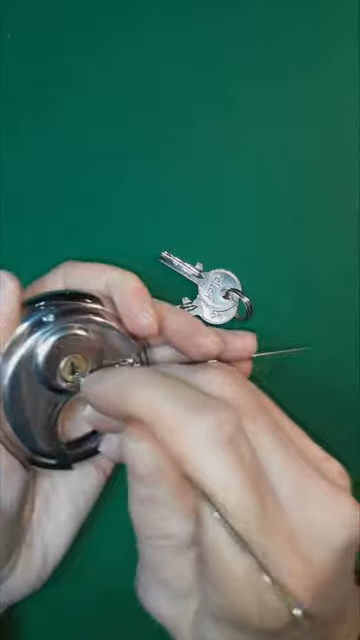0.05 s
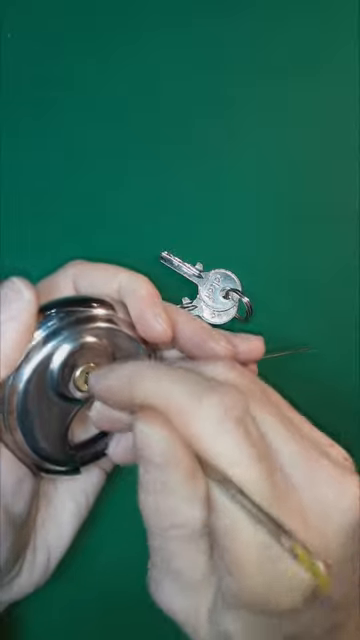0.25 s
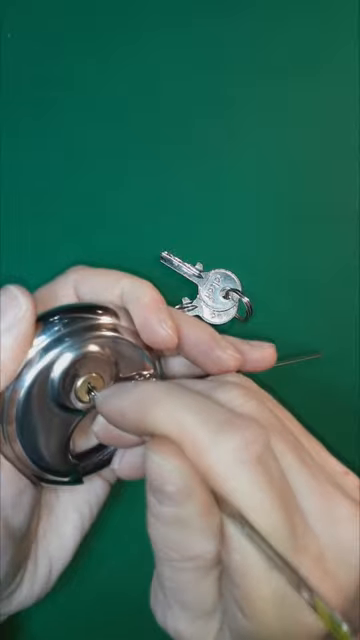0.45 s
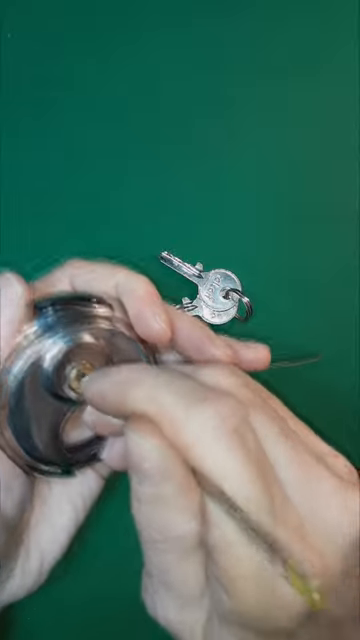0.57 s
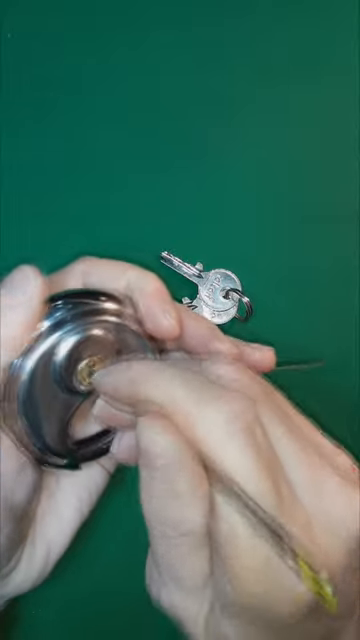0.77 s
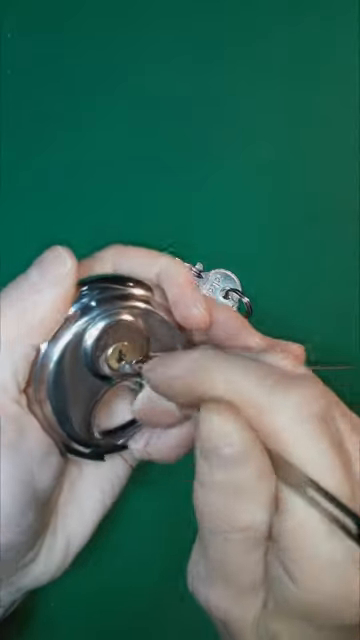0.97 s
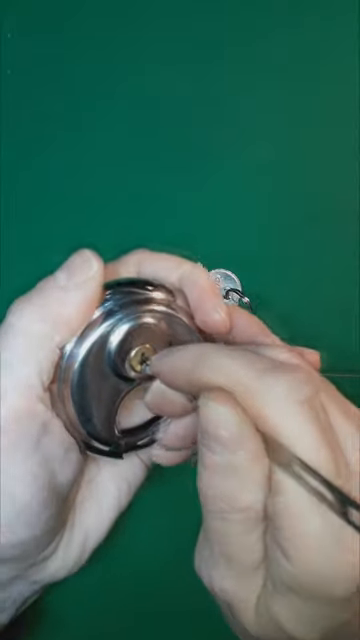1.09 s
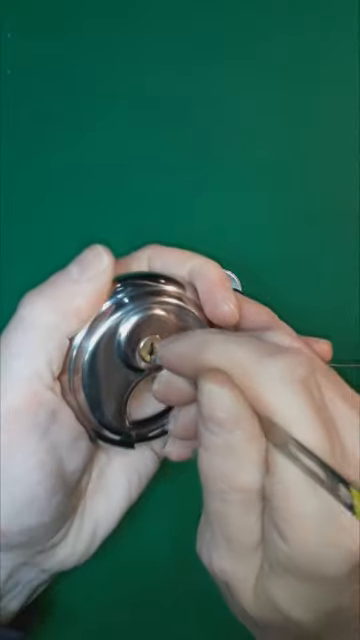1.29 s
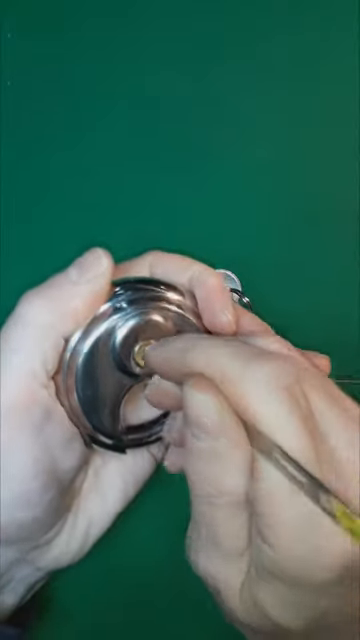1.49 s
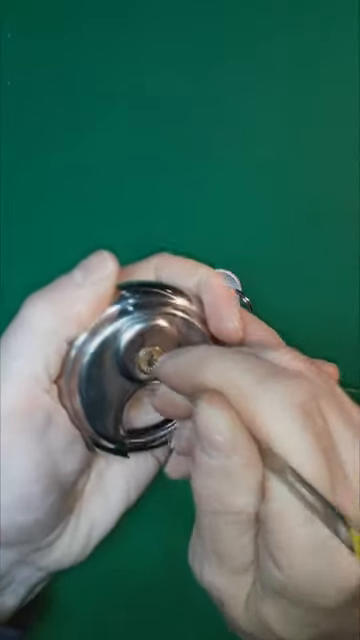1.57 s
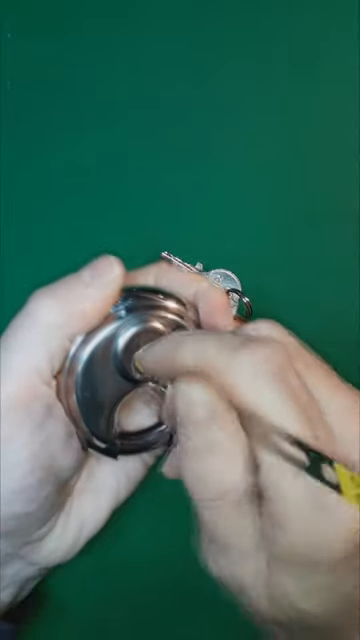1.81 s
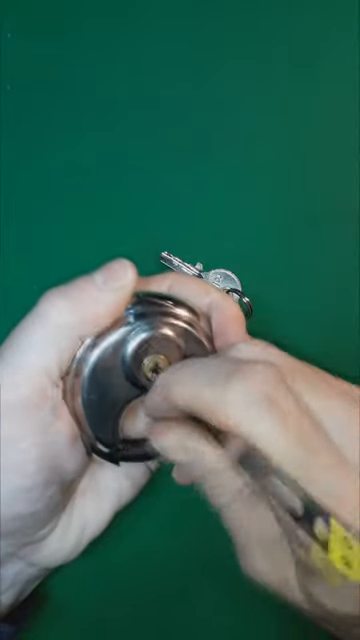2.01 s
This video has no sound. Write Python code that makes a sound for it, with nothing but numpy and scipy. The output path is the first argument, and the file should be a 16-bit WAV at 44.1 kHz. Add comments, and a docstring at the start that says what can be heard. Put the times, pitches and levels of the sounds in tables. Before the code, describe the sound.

A thin steel pick clicks and scrapes inside a metal padlock, with a few loud sharp snaps

```python
"""Small metallic clicks and scrapes, a few loud snaps, rattles dying away and soft skin rustle, close by.
A thin steel pick works inside a round padlock held in both hands, in a quiet room.
Each slip of pick or pin is a short chatter of contacts that rings the lock's modes; snaps are sine packets
and spring tones fading sines. Skin on the case, low rumble and room tone are shaped noise.
Noise tails add near reflections and a longer room tail to the clicks and snaps."""
import sys
import numpy as np
from scipy import signal
from scipy.fft import rfft, irfft
from scipy.io import wavfile

SR = 44100
rng = np.random.default_rng(int(sys.argv[2]) if len(sys.argv) > 2 else 0)


def field_ratio(decibels):
    """Amplitude ratio for a level in dB (20 dB per decade); scalars and array-likes work."""
    return 10 ** (np.asarray(decibels, dtype=float) / 20)


def to_wav(s):
    """Save 16-bit WAV."""
    ch = np.atleast_2d(s).T  # columns
    pcm = np.round(np.clip(ch, -1, 1) * 32767)  # PCM
    wavfile.write(sys.argv[1], SR, pcm.astype(np.int16))


N = 90404

# slips of the pick: (time [s], strength [dB], mid share [dB], top share [dB],
# chatter length [ms], lasting ring share [dB]); pick() trims strengths and caps the shares
PICK_SLIPS = [(0.0054, -22.5, -5, -14.5, 3.6, -28), (0.1082, -48.5, 10, -4, 1.1, -48),
              (0.2046, -46, 7, -9, 1.5, -26), (0.2147, -22, -3, -11.5, 0.7, -36),
              (0.2195, -21.5, 13, -1, 1.9, -40), (0.229, 1.5, -34.5, -25.5, 0.43, -29),
              (0.327, -33.5, 3, -13.5, 0.28, -23.5), (0.351, -52.5, 2.5, -13, 2, -31),
              (0.5722, -52.5, 11, -21, 1.53, -13.5), (0.5971, -36, -2, 0.5, 1.3, -16),
              (0.662, -47, 16, -8, 4.5, -14), (0.6691, -35, -57, -44, 0.66, -26),
              (0.8599, -57, 10.5, -7, 0.89, -11), (0.8813, -28, -7.5, -22.5, 0.432, -27.5),
              (0.9424, -42.5, 5, -17, 2.8, -21), (0.9683, -62, 4, -7, 1.05, -24),
              (0.9743, -43, -15, -12, 1, -23), (0.9813, -35.5, 7.5, 0, 2, -10),
              (0.991, -34.5, 1, -12, 0.89, -10), (0.9934, -34, 9, -26, 1.8, -23),
              (1.0077, -27.5, 2, -4, 2.2, -26), (1.0373, -43.5, -2, -14, 3, -26),
              (1.0542, -40, -6, -23, 0.74, -31), (1.0692, -36.5, 9.5, -16, 1.9, -19),
              (1.0705, -35, 0, -12, 2.9, -24), (1.0764, -30.5, 4, -6, 4.9, -16),
              (1.0888, -48.5, 11, -5, 3.1, -10.5), (1.0907, -18.5, -7.5, -9.5, 2.9, -22.5),
              (1.16, -53.5, 6, -6, 1.6, -36), (1.271, -56, 4, -15, 0.63, -19),
              (1.2727, -51, 10, -34, 3.1, -3.5), (1.3075, -42, 0, -4, 2.7, -28),
              (1.3095, -43, -29, -38, 5.2, -19), (1.3909, -50, 6, -19.5, 6.3, -18),
              (1.425, -33, 11, -2, 2.7, -9), (1.4355, -30.5, 13.5, -34, 1.8, -8.5),
              (1.4607, -33, 6.5, 0, 1.2, -20), (1.4985, -57, -10, -16, 1, -20),
              (1.5115, -46, 13, 7, 2.44, -28), (1.5179, -30, 1, -8, 2.9, 0),
              (1.5262, -28.5, 7.5, -22, 5.8, -18), (1.5373, -28, 7, -12, 0.61, -24),
              (1.5396, -9, -12.5, -4.5, 0.61, -27), (1.5983, -42.5, 6.5, -6, 2.7, -14),
              (1.6972, -56, -17, -18, 2.7, -22), (1.731, -47, -2, -16, 4.3, -20),
              (1.747, -55, -4, -1.5, 2, -12), (1.777, -30, -1, 4, 1.6, -19.5),
              (1.9396, -37.5, -4, -9, 0.71, -19.5), (1.9449, -34, 3, -10, 2.4, -28),
              (1.9764, -44.5, -16, -31, 1.4, -23), (1.9828, -41.5, -1, -25, 0.58, -22),
              (1.9946, -43, -9.5, -14, 0.5, -15), (2.038, -49, -22, -18, 0.67, -14)]
# lock modes damped by the hands: (frequency [Hz], level [dB], t60 before the damping cap [s])
LOCK_MODES = [(1890, -20.5, 0.0021), (2194, -16, 0.036), (2938, -3, 0.014), (3166, -1.5, 0.0096),
              (3540, -10, 0.0072), (4390, -1.5, .011), (4776, -5.5, 0.011), (5210, -3.5, 0.01),
              (5780, 0.5, 0.0074), (6297, -5, 0.019), (6573, -11.5, 0.03), (7034, -6.5, 0.015),
              (11716, 4, 0.0027), (13400, 9.5, 0.001), (15100, -11.5, 0.0019)]
MID_FROM_HZ, TOP_FROM_HZ = 3800, 9000  # modes in these ranges follow the mid and top shares
LONGEST_T60_S = 0.016  # the hands let no lock mode ring longer
LEAD, RUN = 400, 1000  # samples of creep before a slip, and of its whole run


def cut(x, hz, kind, order=2):
    """Butterworth filter."""
    return signal.sosfilt(signal.butter(order, hz, kind, fs=SR, output="sos"), x)


def rms_one(x):
    """Scale to rms 1."""
    return x / np.sqrt(np.mean(x ** 2) + 1e-20)


def in_time(rows):
    """Draw each automation column at every sample, with straight lines between points."""
    times, *columns = np.transpose(rows)
    return [np.interp(np.arange(N) / SR, times, column) for column in columns]


def coloured(spectrum):
    """Noise of rms 1 whose spectrum follows the curve, in dB over log frequency."""
    hz, db = np.transpose(spectrum)
    grid = np.maximum(np.arange(N // 2 + 1) * SR / N, 1)
    gain = field_ratio(np.interp(np.log(grid), np.log(hz), db, left=-80, right=-80))
    return rms_one(irfft(rfft(rng.standard_normal(N)) * gain, N))


def drift(rate):
    """Slow chance: straight lines between random knots of spread 1, at rate knots per second."""
    knots = rng.standard_normal(400)
    return np.interp(np.arange(N) / SR * rate, np.arange(400), knots)


def ring(push, hz, t60):
    """Two-pole resonator: a unit click sets a decaying sine of starting height 1 ringing."""
    radius, turn = field_ratio(-60 / (t60 * SR)), 2 * np.pi * hz / SR
    return signal.lfilter([0, np.sin(turn)], [1, -2 * radius * np.cos(turn), radius * radius], push + 1e-18)


def contacts(shape, per_s):
    """Tiny contacts at random moments, with uneven sizes and signs."""
    spread_db = 3.0
    moment, size, sign = rng.random((3,) + shape)
    return field_ratio(-spread_db * np.log(size + 0.01)) * np.sign(sign - 0.5) * (moment < per_s / SR)


def rubbing():
    """Skin on the case: flickering low and bright rustle, and noise that rings the lock's low modes."""
    # levels before flicker: (time [s], low rustle [dB], bright rustle [dB], ringing low modes [dB])
    rub_levels = [(0.0, -77, -74, -73), (0.2, -71, -66.5, -83), (0.35, -64.5, -62, -87),
                  (0.48, -70, -69, -86), (0.55, -74.5, -73.5, -85), (0.65, -71, -66.5, -74),
                  (0.69, -88.5, -96, -81), (0.91, -78, -76.5, -101), (1.03, -69.5, -58.5, -78),
                  (1.18, -87.5, -69.5, -97), (1.37, -95, -82, -83), (1.49, -68.5, -63.5, -65),
                  (1.61, -63.5, -59.5, -70.5), (1.66, -67, -65.5, -68.5), (1.73, -58.5, -55.5, -59.5),
                  (1.88, -65.5, -65, -67.5), (2.05, -74.5, -65, -66)]
    # colours of the two rustles: (frequency [Hz], density [dB per Hz])
    low_colour = [(88, -45.5), (150, -13), (283, -2.5), (401, 3), (468, 0), (728, -1.5), (954, -4),
                  (1500, -12.5), (1950, -40.5), (3300, -120)]
    bright_colour = [(880, -26.5), (1500, -19), (1690, -1.5), (2560, -4), (2830, -11.5), (3590, -4.5),
                     (4550, -1), (7170, -3), (9280, -27), (13700, -13), (16000, -21.5)]
    flicker_db = 2
    low_db, bright_db, lock_db = in_time(rub_levels)
    white = rng.standard_normal(N)
    lock = rms_one(sum(field_ratio(db) * ring(white, hz, min(t60, LONGEST_T60_S))
                       for hz, db, t60 in LOCK_MODES if hz < MID_FROM_HZ))
    bright = field_ratio(bright_db) * coloured(bright_colour) + field_ratio(lock_db) * lock
    low = field_ratio(low_db + flicker_db * drift(21)) * coloured(low_colour)
    return low + field_ratio(flicker_db * drift(87)) * bright


def rumble():
    """Thumps of the hands felt through the table: low band noise that swells and sinks."""
    # (time [s], level [dB])
    rumble_levels = [(0.0, -87), (0.03, -61.5), (0.16, -80.5), (0.25, -52), (0.29, -65.5), (0.39, -79.5),
                     (0.93, -82.5), (1.08, -76), (1.25, -87.5), (1.57, -65), (1.59, -77.5), (2.05, -72)]
    level_db, = in_time(rumble_levels)
    noise = cut(rng.standard_normal(N + 4000), [65, 139], "band", order=3)
    return field_ratio(level_db) * rms_one(noise[4000:])  # skip the filter's start


def room_tone():
    """Steady coloured noise of the quiet room."""
    # (frequency [Hz], density [dB per Hz])
    room_colour = [(15, -50), (25, -13.5), (263, -5.5), (516, -7), (677, -11.5), (1440, -18), (1740, -34.5),
                   (2280, -25.5), (10400, -23.5), (14800, -26.5), (16000, -25)]
    return field_ratio(-86.5) * coloured(room_colour)


def chatters():
    """One run of contacts per slip: it creeps in, swells over its length, then settles; energy 1."""
    creep_db, creep_s = -20.5, 0.004  # faint contacts grow before each slip
    settle_s, settle_share = 0.00088, 0.82  # fall time: a fixed part plus a share of the length
    t = (np.arange(RUN) - LEAD) / SR
    length = np.array(PICK_SLIPS)[:, 4:5] / 1000
    swell = np.clip(t / length, 0, 1) ** 1.5
    creep = field_ratio(creep_db) * np.exp(np.minimum(t, 0) / creep_s)
    settle = np.exp(-np.maximum(t - length, 0) / (settle_s + settle_share * length))
    grains = np.array([contacts((RUN,), 14000) for _ in PICK_SLIPS])
    runs = (swell + creep) * settle * grains
    return runs / np.sqrt(np.sum(runs ** 2, axis=1, keepdims=True))


def place(runs, gains_db):
    """Lay the runs on the time line, each led in by its creep."""
    out = np.zeros(N + RUN)
    for row, run, db in zip(PICK_SLIPS, runs, gains_db):
        i = int(row[0] * SR)
        out[i:i + RUN] += field_ratio(db) * run
    return out[LEAD:N + LEAD]


def strike(runs, gains_db, hz, t60):
    """Ring one mode; each run feeds it as much energy as a single contact of its strength."""
    single = np.sum(ring(signal.unit_impulse(RUN, LEAD), hz, t60) ** 2)
    fed = np.sum(ring(runs, hz, t60) ** 2, axis=1, keepdims=True)
    return ring(place(runs * np.sqrt(single / fed), gains_db), hz, t60)


def pick():
    """Every slip strikes all modes with strengths of its own, plus bare cracks and a dull knock in the palm."""
    # modes that keep ringing: (frequency [Hz], level [dB], t60 [s])
    bell_modes = [(2840, 4.5, .1), (2920, -2, 0.11), (4650, -13.5, 0.04), (7040, -17.5, .06),
                  (11500, -22.5, 0.027)]
    slip_gain_db, mode_scatter_db = -6.5, 6
    most_mid_db, most_top_db, most_ring_db = 9, -12, -19  # caps on the shares
    crack_db, crack_top_db, thud_db = -14, -17, -20.5
    runs = chatters()
    _, strength, mid, top, _, lasting = np.transpose(PICK_SLIPS)
    mid, top = np.minimum(mid, most_mid_db), np.minimum(top, most_top_db)
    lasting = np.minimum(lasting, most_ring_db)
    scatter = mode_scatter_db * rng.standard_normal((len(PICK_SLIPS), 24))
    peak = strength + slip_gain_db
    # the contacts themselves, heard bare
    metal = cut(place(runs, peak + mid + crack_db), 18000, "low", order=4)
    metal += cut(place(runs, peak + top + crack_top_db), [11000, 14800], "band")
    for k, (hz, db, t60) in enumerate(LOCK_MODES):
        share = 0 if hz < MID_FROM_HZ else mid if hz < TOP_FROM_HZ else top
        metal += strike(runs, peak + share + db + scatter[:, k], hz, min(t60, LONGEST_T60_S))
    for k, (hz, db, t60) in enumerate(bell_modes):
        metal += strike(runs, strength + lasting + db + scatter[:, -1 - k], hz, t60)
    rattle, knocks = rattles()
    # the case knocks in the palm
    thud = cut(place(runs, strength + thud_db) + knocks, [300, 1300], "band")
    # small parts radiate little bass
    return cut(metal + rattle, 1866, "high", order=4) + thud


def spring():
    """Thin wavering sines that fade and sing until the next touch damps them fast."""
    # (start [s], end [s], frequency [Hz], starting level before wavering [dB], fade [dB per s])
    spring_tones = [(.025, .107, 6360, -65, 110), (.688, .712, 1090, -68, 60), (1.1, 1.272, 2911, -53, 170),
                    (1.315, 1.425, 2910, -61, 70)]
    t, out = np.arange(N) / SR, 0
    for start, end, hz, db, fade in spring_tones:
        level = field_ratio(db - fade * np.maximum(t - start, 0))
        gate = np.clip((t - start) / 0.0021, 0, 1) * np.clip((end - t) / 0.0036, 0, 1)
        out = out + level * gate * np.sin(2 * np.pi * hz * t) * field_ratio(2.0 * drift(52))
    return out


def rattles():
    """Loose parts rattle on: dying showers of contacts into the damped modes, and knocks for the palm."""
    # (start [s], level before mode and drive gains [dB], t60 [s], share of mid and top modes [dB])
    showers = [(0.198, -62, 0.063, -3), (0.231, -23, 0.14, -5), (.328, -44, 0.077, -14),
               (0.561, -71, 0.1, 4), (0.598, -62, 0.085, 4), (0.671, -66, 0.19, 3.5), (0.88, -56, 0.23, 0),
               (0.966, -63.5, 0.333, 6), (1.03, -69, 0.13, -2), (1.096, -50, 0.22, -9),
               (1.277, -74.5, 0.59, 1.5), (1.375, -70, 0.2, -6), (1.442, -51.5, 0.15, 7),
               (1.541, -35.5, 0.11, -2), (1.722, -58, 0.52, -19), (1.94, -61.5, 0.376, 6.5)]
    top_db, drive_db, knock_db = -13.5, -17.5, -14.5
    t = np.arange(N) / SR
    grains = rms_one(contacts((N,), 4100))
    low, mid = 0, 0
    for start, db, t60, share in showers:
        fall_db = db - 60 * np.maximum(t - start, 0) / t60
        onset = np.clip((t - start) / 0.00067, 0, 1)
        low = low + field_ratio(fall_db) * onset
        mid = mid + field_ratio(fall_db + share) * onset
    out = 0
    for hz, db, t60 in LOCK_MODES:
        push = low if hz < MID_FROM_HZ else mid if hz < TOP_FROM_HZ else mid * field_ratio(top_db)
        out = out + ring(field_ratio(db + drive_db) * push * grains, hz, min(t60, LONGEST_T60_S))
    return out, field_ratio(knock_db) * low * grains


def snaps():
    """A pin springs home with one clean blow: a sine packet with quick rise and exponential fall."""
    # (time [s], level before rise and fall [dB], frequency [Hz], t60 [s])
    blows = [(.2291, 8, 3120, .007), (.6689, -31, 2860, .02), (1.0926, -20, 2840, .028),
             (1.5393, -5, 2700, .006), (1.7777, -21, 2900, .005)]
    rise_s, out = 0.0006, 0
    for start, db, hz, t60 in blows:
        t = np.maximum(np.arange(N) / SR - start, 0)
        rise = 1 - np.exp(-(t / rise_s) ** 2)
        out = out + field_ratio(db - 60 * t / t60) * rise * np.sin(2 * np.pi * hz * t)
    return out


def echoes(x):
    """Near reflections from hands and table and a longer room tail: convolution with decaying noise."""
    near_db, near_t60_s, late_db, late_t60_s, start_s = -17.5, 0.071, -17, 0.14, 0.009
    t = np.arange(SR // 3) / SR
    # each decay has energy 1 before its level
    near, late = [rms_one(field_ratio(-60 * t / t60)) / np.sqrt(len(t)) for t60 in (near_t60_s, late_t60_s)]
    decay = field_ratio(near_db) * near + field_ratio(late_db) * late
    tail = rng.standard_normal(len(t)) * decay * np.clip(t / start_s, 0, 1)
    return signal.fftconvolve(x, tail)[:N]


def scene():
    """All sources in one channel; only the pick and the snaps have echoes."""
    metal = pick() + snaps()
    mix = metal + echoes(metal) + spring() + rubbing() + rumble() + room_tone()
    return mix[None]


def low_pass(x):
    """Removes everything above the highest recorded frequency."""
    return signal.sosfilt(signal.butter(12, 16650, fs=SR, output="sos"), x)


def record(dry):
    """A steep low-pass takes off the extreme top."""
    mix = cut(dry, 15700, "low", order=10)
    return low_pass(mix)


dry = scene()
out = record(dry)
to_wav(out)
```